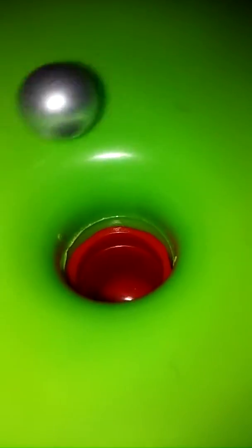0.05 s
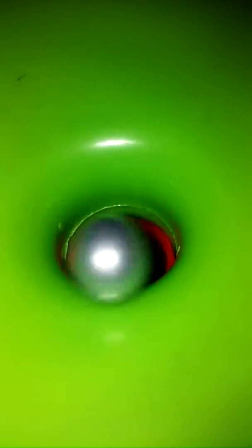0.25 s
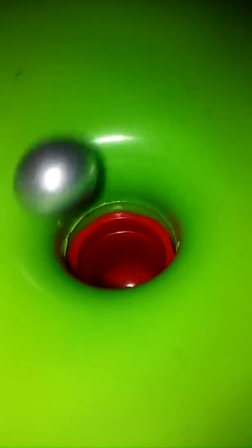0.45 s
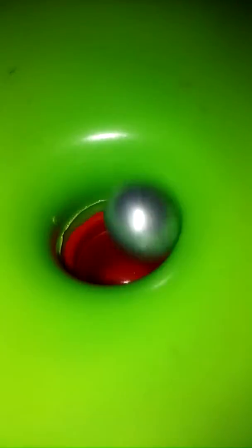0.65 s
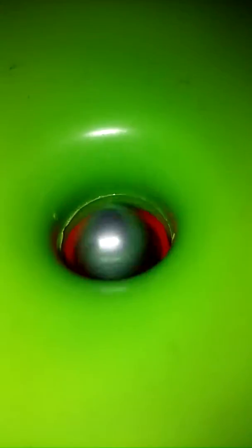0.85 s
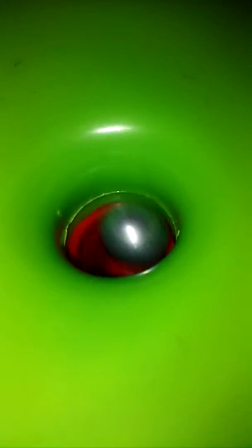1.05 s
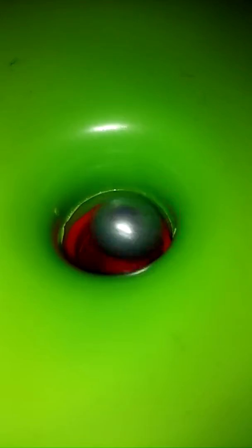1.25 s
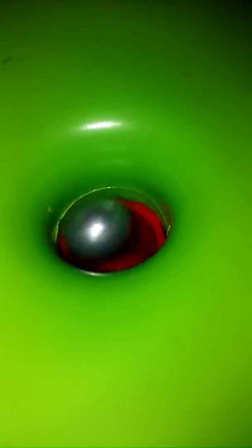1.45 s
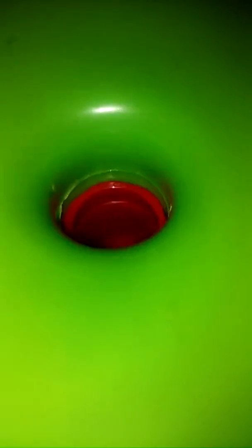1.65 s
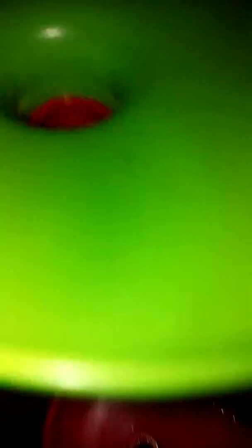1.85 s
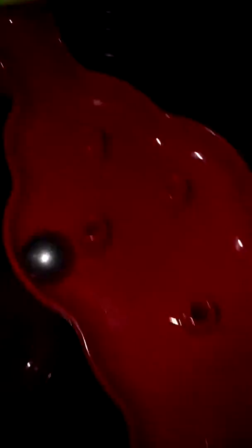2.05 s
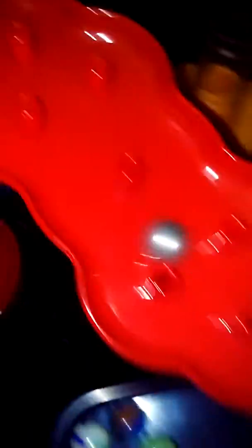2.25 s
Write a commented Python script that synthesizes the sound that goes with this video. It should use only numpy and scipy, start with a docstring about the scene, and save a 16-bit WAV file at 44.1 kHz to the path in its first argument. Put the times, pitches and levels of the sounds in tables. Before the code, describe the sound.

A hard marble rolls and rattles around a plastic funnel, then clacks along a plastic track.

```python
"""A small hard marble rolls and rattles in a plastic funnel, whirls round its throat, drops through
and clacks along a plastic track. Rolling drives the wall's resonances continuously; each impact sets
the thin wall into free, damped vibration, and a small room reverberates. A faint low tone comes and
goes early on; a soft bump and a squeaky scuff end the scene, all over quiet background noise.
The close microphone overloads on the hardest clacks."""
import sys
import numpy as np
from scipy import signal
from scipy.fft import rfft, irfft, next_fast_len
from scipy.io import wavfile
from scipy.ndimage import uniform_filter1d, minimum_filter1d, map_coordinates

SR = 44100
rng = np.random.default_rng(int(sys.argv[2]) if len(sys.argv) > 2 else 0)


def to_wav(sig):
    """Store sig (one row per channel, or 1-D mono) as 16-bit WAV at the path in sys.argv[1].

    Samples outside -1..1 are clipped; the rate is SR.
    """
    pcm = np.clip(np.atleast_2d(sig), -1, 1) * 32767
    pcm = np.round(pcm).astype(np.int16)
    wavfile.write(sys.argv[1], SR, pcm.T)  # frames by channels


N = 105840
TIME = np.arange(N) / SR


def amp(db):
    return 10 ** (np.asarray(db) / 20)


def unit_rms(x):
    return x / np.sqrt(np.mean(x ** 2) + 1e-20)


def along(points, hz):
    """Interpolation of (frequency, value) points on a log axis."""
    f, v = np.transpose(points)
    return np.interp(np.log(hz + 1), np.log(f + 1), v)


def curves(rows):
    """Linear interpolation in time: one curve for each column after the first."""
    times, *columns = np.transpose(rows)
    return [np.interp(TIME, times, column) for column in columns]


def wobble(rate):
    """Smooth random modulation, rate knots a second."""
    return map_coordinates(rng.standard_normal(4096), [TIME * rate], mode="wrap")


def filtered(x, response):
    """Linear filtering: the spectrum times a frequency response."""
    size = next_fast_len(len(x) + 8192)
    return irfft(rfft(x, size) * response(np.fft.rfftfreq(size, 1 / SR)), size)[:len(x)]


def coloured(x, spectrum):
    """Zero-phase filtering by (frequency, gain) points."""
    return filtered(x, lambda hz: amp(along(spectrum, hz)))


def noise(spectrum):
    """Coloured Gaussian noise of rms 1."""
    return unit_rms(coloured(rng.standard_normal(N), spectrum))


def minimum_phase(gain_db, size=4096):
    """Causal impulse response for a gain curve, by folding the cepstrum."""
    cepstrum = irfft(np.log(amp(gain_db(np.fft.rfftfreq(size, 1 / SR)))))
    cepstrum[1:size // 2] *= 2
    cepstrum[size // 2 + 1:] = 0
    return irfft(np.exp(rfft(cepstrum)))


def dense_modes(t60, count, size):
    """Modal overlap: crowded modes act as noise, each frequency decaying at its own rate."""
    hz, t, spectra = signal.stft(rng.standard_normal(count), SR, nperseg=size)
    decay = 1000. ** (-t / np.maximum(t60(hz), .002)[:, None])
    return signal.istft(spectra * decay, SR, nperseg=size)[1][:count]


def mode(t, hz, t60):
    """Free vibration of a damped oscillator."""
    return np.sin(2 * np.pi * hz * t) * np.exp(-np.log(1000) * t / t60)


def rise(t, tau_s):
    return 1 - np.exp(-t / tau_s)


def glide(hz):
    """A sinusoid of rms 1 whose phase is the integral of frequency."""
    return np.sqrt(2) * np.sin(2 * np.pi * np.cumsum(hz) / SR)


def add(out, start_s, x):
    """Superposition of x on out."""
    i = max(round(start_s * SR), 0)
    out[i:i + len(x)] += x[:max(N - i, 0)]


# rolling envelope, ahead of the bass and treble gains (time [s], level [dB])
ROLL_LEVEL = [(0, -35), (.04, -43), (.15, -45.5), (.31, -39.5), (.44, -34), (.48, -29.5), (.52, -40.5),
              (.66, -31), (.82, -34.5), (.92, -33), (1.02, -31.5), (1.16, -30), (1.3, -35.5), (1.42, -29),
              (1.49, -40.5), (1.545, -32), (1.66, -34), (1.745, -32.5), (1.772, -26.5), (1.795, -40),
              (1.97, -48.5), (2.04, -53.5), (2.15, -53), (2.27, -64.5)]
# balance of the rolling sound (time [s], bass gain [dB], treble gain [dB])
ROLL_BALANCE = [(0, -11, -4), (.5, -23, -9.5), (.92, -20, -8), (1.1, 10, -0.5), (1.35, 1, -2),
                (1.5, -8.5, -0.5), (1.72, 0, 2.5), (1.78, -7, 6.5), (2, 2.5, -1)]
# modulation in each turn (time [s], depth [dB])
WHIRL_DEPTH = [(0, 0), (1.3, 3), (1.52, 2.5), (1.76, 3.5), (1.8, 1.5)]
# excitation by surface bumps (frequency [Hz], gain [dB])
ROUGHNESS_SPECTRUM = [(30, -26), (150, -21), (240, 7), (3000, 6.5), (5500, -1.5), (7000, -1.5),
                      (8000, -8.5), (9200, -6.5), (11000, -13.5), (16000, -13)]
# funnel resonances under the marble (frequency [Hz], bandwidth [Hz], gain [dB])
ROLL_RESONANCES = [(260, 36, -5), (573, 43, -1), (843, 450, -10), (1193, 120, 2), (1403, 120, -2),
                   (2070, 120, -2), (2430, 69, -6), (3150, 147, -2.5), (4485, 150, -1.5), (5170, 260, -3),
                   (6730, 180, -6), (8470, 500, -17)]
WHIRL_HZ, NEAREST_S = 44.48, 1.589  # turns a second; a moment nearest the microphone

def rolling():
    """Forced vibration: tiny bumps drive the funnel; each turn swings the level, most in the treble."""
    level_db, = curves(ROLL_LEVEL)
    bass_db, treble_db = curves(ROLL_BALANCE)
    depth_db, = curves(WHIRL_DEPTH)
    turn_db = depth_db * np.cos(2 * np.pi * WHIRL_HZ * (TIME - NEAREST_S) + 0.63 * wobble(20))
    bumps = rng.standard_normal(N) * amp(2.85 * wobble(900) + 1.6 * wobble(110) + turn_db)
    bumps = coloured(bumps, ROUGHNESS_SPECTRUM)
    wall = np.zeros(N)
    for k, (hz, width, db) in enumerate(ROLL_RESONANCES):
        coupling_db = 2.5 * wobble(rate=35)  # swells and fades as the marble crosses nodes
        resonance = filtered(bumps, lambda f: 1j * f * width / (hz * hz - f * f + 1j * f * width))
        wall += (-1) ** k * amp(db + coupling_db) * resonance
    wall = unit_rms(wall)
    bass = filtered(wall, lambda f: 1 / (1 + (f / 400) ** 6))
    treble = filtered(wall, lambda f: 1 - 1 / (1 + (f / 2800) ** 6))
    return amp(level_db) * (wall + (amp(bass_db) - 1) * bass + (amp(treble_db + turn_db) - 1) * treble)


# noise floor (frequency [Hz], relative level [dB])
BACKGROUND_SPECTRUM = [(25, -17.5), (40, -11), (55, 19), (85, 2), (250, 10.5), (600, -3.5), (2000, -6.5),
                       (6000, -18.5), (10000, -21), (16000, -31.5)]

def background(level_db=-53.5):
    """Stationary noise, strongest in the bass."""
    return amp(level_db) * noise(BACKGROUND_SPECTRUM)


# reverberation time (frequency [Hz], t60 [s])
ROOM_DECAY = [(200, 0.44), (1200, 0.16), (4500, 0.16), (6500, 0.31), (8200, 0.18), (15000, 0.099)]
# colour of the reverberation (frequency [Hz], gain [dB])
ROOM_SPECTRUM = [(100, 2.5), (300, 3), (1200, 10.5), (3000, 1), (6500, 3), (8200, -6), (12000, 4.5)]

def room(x, gain_db=-21.5, delay_s=0.0067):
    """Reverberation: convolution with the short diffuse tail of a small room."""
    tail = dense_modes(lambda hz: along(ROOM_DECAY, hz), count=SR // 2, size=256)
    tail = coloured(tail, ROOM_SPECTRUM)
    wet = np.zeros(N)
    add(wet, delay_s, signal.fftconvolve(x, tail / np.linalg.norm(tail)))
    return amp(gain_db) * wet


# wave reflected from the rim (frequency [Hz], gain [dB])
RIM_SPECTRUM = [(700, -41.5), (1600, -4.5), (2500, -3.5), (4500, 5.5), (6500, -1), (9000, 3), (14000, -35)]

def rim_echo(t):
    """Dispersion: bending waves travel faster at high frequency, so the echo chirps down."""
    lag_s = .008 * np.exp(0.199 * rng.standard_normal())  # scale of the travel time
    hz = np.fft.rfftfreq(len(t), 1 / SR)
    phase = np.pi * lag_s * (.4 * hz - 4 * np.sqrt(1000 * hz))
    return irfft(amp(along(RIM_SPECTRUM, hz)) * np.exp(1j * phase), len(t)) * (t < .05)


# colour common to all impacts (frequency [Hz], gain [dB])
WALL_SPECTRUM = [(30, -24), (130, -29.5), (240, 0.5), (400, -2.5), (700, 2.5), (1200, 1), (2200, 2.5),
                 (4500, 5.5), (6800, 13), (8300, 2), (10500, -4.5), (15500, 5)]
# damping of the wall (frequency [Hz], multiple of an impact's base t60 [1])
WALL_DECAY = [(200, 1.8), (1200, 1.72), (4000, 1.46), (7000, 0.67), (11000, 0.49)]
RIM_DB, SPOT_DB, BODY_DB = -5, -2.5, -9  # relative to the burst, the burst and the clack

def clack(t, tint, spot_hz, t60):
    """Impulse response of a thin wall: a burst of dense modes, a rim echo and the struck spot's note."""
    onset = t < .006
    burst = dense_modes(lambda hz: t60 * along(WALL_DECAY, hz), count=len(t), size=64)
    burst *= 1 + 0.74 * np.exp(-t / 0.00085)
    echo = rim_echo(t)
    burst += amp(RIM_DB) * echo * np.linalg.norm(burst[onset]) / np.linalg.norm(echo)
    colour = minimum_phase(lambda hz: along(tint, hz) + along(WALL_SPECTRUM, hz))
    burst = signal.fftconvolve(burst, colour)[:len(t)]
    spot = mode(t, spot_hz, t60=0.025 * np.sqrt(2000 / spot_hz)) * rise(t, .0006)
    both = burst / np.std(burst[onset]) + amp(SPOT_DB) * spot / np.std(spot[onset])
    return both / np.std(both[onset]) * rise(t, 0.00016)


def body_ring(t, modes):
    """Modal superposition: the whole part rings, with random weights and slight detuning."""
    body = np.zeros(len(t))
    for hz, db, t60 in modes:
        weight = amp(db + 5.06 * rng.standard_normal()) * rng.choice([-1, 1])
        body += weight * mode(t, hz * (1 + 0.0076 * rng.standard_normal()), t60)
    return body * rise(t, 0.0019)


def impacts(hits, modes):
    """Impact excitation: each contact gives a local clack and rings the whole part."""
    out, t = np.zeros(N), np.arange(12000) / SR
    fade = 1 - t / t[-1]
    for start_s, db, thud_db, tilt_db, crack_db, spot_hz, t60 in hits:
        tint = [(650, thud_db + 10), (1300, -tilt_db / 2), (2300, -tilt_db / 2),
                (4000, tilt_db / 2 - 4), (6500, tilt_db / 2 - 9),
                (10000, crack_db + 8), (15000, crack_db - 6)]  # (frequency [Hz], gain [dB])
        impact = clack(t, tint, spot_hz, t60) + amp(BODY_DB) * body_ring(t, modes)
        add(out, start_s, amp(db) * impact * fade)
    return out


# contacts with the funnel
# (time [s], level [dB], thud [dB], treble tilt [dB], crack [dB], spot frequency [Hz], base t60 [s])
FUNNEL_CONTACTS = [(0.0452, -26, -30, 26, -9, 1130, 0.032), (0.0932, -22, -17, -5, -35, 2260, 0.037),
                   (0.1079, -27, -14, -10, -34, 2270, 0.026), (0.2082, -38, 0, -36, -33, 2050, 0.029),
                   (0.2314, -14.5, -22, 2, -10.5, 5350, 0.064), (0.2528, -16.5, -19, 6, -16, 1116, 0.029),
                   (0.2796, -26.5, -10, 6, -36, 6400, 0.048), (0.2967, -37, -18, 6, -31, 1150, 0.033),
                   (0.3722, -12.5, -15, -0.5, -14, 2955, 0.062), (0.3932, -14, -14.5, 7, -21, 2060, 0.031),
                   (0.419, -27, -3, 6, -19, 2090, 0.032), (0.5267, -5, -26, -0.5, -23, 2444, 0.037),
                   (0.5402, -5, -14, 1.5, -22, 2402, 0.028), (0.5535, -10, -30, 13, -28, 2490, 0.049),
                   (0.5724, -9, -34, 2, -39, 2054, 0.0093), (0.5897, -15.5, -45, 1, -25, 2060, 0.042),
                   (0.6115, -23.5, -33, 6, -32, 2120, 0.029), (0.6575, -2.5, -15, 3, -47, 1665, 0.065),
                   (0.6769, -14.5, -11, 0, -39, 2090, 0.03), (0.6933, -17, -26, -24, -17, 4550, 0.025),
                   (0.712, -23, -11, -1, -18, 4316, 0.04), (0.7276, -6, -27, -8.5, -23, 3597, 0.019),
                   (0.7695, -9.5, -15.5, -4.5, -26, 1604, 0.021),
                   (0.7949, -11.5, -62, -6, -56, 1670, 0.014),
                   (0.8103, -14.5, -22, -10.5, -28.5, 3860, 0.095),
                   (0.9443, -18.5, -13.5, 16, -15, 2083, 0.092), (0.9532, -12, -48, -11, -25, 1863, 0.0091),
                   (0.9809, -35, -6, 8, -27, 1380, 0.04), (0.997, -31, -1, 23, -10, 2080, 0.036),
                   (1.0496, -21.5, -12, -7, -22, 1445, 0.034), (1.0608, -19, -17, 13, -13, 2870, 0.04),
                   (1.1053, -19, -13, -2, -22, 5080, 0.063), (1.1298, -12.5, -21, -3.5, -45, 1365, 0.031),
                   (1.1377, -21.5, -16, 0, -14, 1250, 0.045), (1.1538, -15, -10.5, -8, -29, 2520, 0.016),
                   (1.1773, -35, 18, 4, -30, 2050, 0.056), (1.1894, -20, -15.5, -10, -38, 4500, 0.021),
                   (1.2084, -21.5, -15, -5, -26, 4420, 0.035), (1.2382, -21, -19, -14, -40, 1850, 0.009),
                   (1.2606, -38, 19, -4, -30, 2100, 0.013), (1.2755, -11, -19, -8, -32, 4530, 0.015),
                   (1.2882, -18.5, -16, -10, -39, 1390, 0.048), (1.2966, -25.5, -6.5, 0, -21, 2060, 0.071),
                   (1.3667, -23.5, -7, 0, -26, 1380, 0.025), (1.7927, -10, -4, 33, -1, 5160, 0.024)]
# normal modes of the funnel (frequency [Hz], relative level [dB], t60 [s])
FUNNEL_WALL_MODES = [(246.1, -21.5, .2), (595, -23.5, 0.11), (1117, -7, 0.12), (1256, -25.5, 0.27),
                     (1410, -12.5, 0.051), (1717, -19.5, 0.18), (2082, -1.5, 0.083), (2290, -5, .08),
                     (2514, -0.5, 0.044), (3097, 0, 0.051), (3650, -7.5, 0.047), (4388, 10, 0.027),
                     (5420, -24, 0.049)]

def funnel_rattle():
    """Free vibration of the funnel after each strike of the marble."""
    return impacts(FUNNEL_CONTACTS, FUNNEL_WALL_MODES)


# course of the low tone (time [s], frequency [Hz], level [dB])
LOW_TONE_PATH = [(.05, 349.4, -71), (.09, 361, -51), (.13, 353, -41), (.21, 323.7, -46.5),
                 (.28, 359.6, -49.5), (.4, 340, -62), (.56, 353.4, -58), (.61, 344, -42), (.69, 335, -42),
                 (.76, 367, -47), (.8, 359.6, -72)]

def low_tone():
    """Amplitude and frequency modulation: a faint tone wavers while the marble circles."""
    hz, db = curves(LOW_TONE_PATH)
    return amp(db) * glide(hz)


# contacts with the track
# (time [s], level [dB], thud [dB], treble tilt [dB], crack [dB], spot frequency [Hz], base t60 [s])
TRACK_CONTACTS = [(1.8152, -4, -20.5, 0.5, -12.5, 1415, 0.03), (1.8731, -19, -5, -8, -21, 2150, 0.04),
                  (1.889, -6.5, -13.5, 2.5, -12.5, 1406, 0.043),
                  (1.9244, -20.5, 6, 16.5, -28.5, 1944, 0.04), (1.9272, -6.5, -12, 2.5, -9.5, 8230, 0.064),
                  (1.9503, -13, -10.5, -2, -21, 2500, 0.054), (2.0102, -33.5, -0.5, 3, -21, 1120, 0.067),
                  (2.1041, -13.5, -6, 7.5, -4.5, 8580, 0.06), (2.1147, -25, -7, -10.5, -40, 2070, 0.052),
                  (2.1437, -23.5, -16, 1, -14, 5900, 0.034), (2.1877, -32, -26.5, -7, -25, 3130, 0.046),
                  (2.2369, -50, -7.5, -7, -15, 1600, 0.031)]
# normal modes of the track (frequency [Hz], relative level [dB], t60 [s])
TRACK_WALL_MODES = [(235, -17, .12), (276, -16, .08), (557, -27, 0.19), (920, -7, 0.17), (1125, 1.5, 0.053),
                    (1362, -3.5, 0.039), (2034, -2, 0.066), (2264, -9, 0.12), (3136, -2, 0.037),
                    (4400, -6, 0.043), (5050, 2.5, 0.045), (6430, -4.5, 0.053)]

def track_clacks():
    """Free vibration of the track as the marble lands and clacks along it."""
    return impacts(TRACK_CONTACTS, TRACK_WALL_MODES)


# course of the squeak (time [s], frequency [Hz], level [dB])
SQUEAK_PATH = [(2.24, 1080, -74), (2.265, 1041, -63), (2.3, 780, -53), (2.35, 799, -49), (2.38, 873, -47.5),
               (2.4, 900, -56)]
# envelope of the scuff (time [s], level [dB])
SCUFF_LEVEL = [(2.25, -67.5), (2.32, -58.5), (2.355, -61), (2.375, -42), (2.4, -44)]
# colour of the scuff (frequency [Hz], relative level [dB])
SCUFF_SPECTRUM = [(150, -9), (500, -0.5), (1000, 2), (1300, -26.5), (1680, 11), (1950, -9.5), (2500, 9.5),
                  (3000, -19), (5200, -27), (7200, 1.5), (9000, -39), (15000, -30)]

def squeaky_scuff():
    """Random frequency modulation roughens a faint squeak over a swell of handling noise."""
    hz, squeak_db = curves(SQUEAK_PATH)
    scuff_db, = curves(SCUFF_LEVEL)
    squeak = amp(squeak_db) * glide(hz * (1 + 0.13 * wobble(350)))
    return squeak + amp(scuff_db) * noise(SCUFF_SPECTRUM)


def soft_bump(start_s=2.309):
    """Heavy damping: one low mode dies within a few cycles."""
    out, t = np.zeros(N), np.arange(SR // 8) / SR
    add(out, start_s, amp(-22) * mode(t, hz=397, t60=0.016) * rise(t, 0.0013))
    return out


def scene():
    """Superposition of the marble's direct sound, its reverberation and the faint sounds around it."""
    marble = funnel_rattle() + track_clacks() + rolling()
    return (marble + room(marble) + low_tone() + squeaky_scuff() + soft_bump() + background())[None]


LIMIT_THRESHOLD, LIMIT_SHARE = 0.99, 0.3  # the limiter removes this share of the excess in dB
CLIP_CEILING, CLIP_HARDNESS = .92, 8
LOW_CUT_HZ, HIGH_CUT_HZ = 187, 16200

def record(dry):
    """Saturation and band limiting: a limiter and soft clip hold the peaks; filters trim both ends."""
    gain = np.minimum(1, LIMIT_THRESHOLD / (np.abs(dry[0]) + 1e-9)) ** LIMIT_SHARE
    limited = dry[0] * uniform_filter1d(minimum_filter1d(gain, size=60), size=40)
    clipped = limited / (1 + np.abs(limited / CLIP_CEILING) ** CLIP_HARDNESS) ** (1 / CLIP_HARDNESS)
    return filtered(clipped, lambda f: 1j * f / (LOW_CUT_HZ + 1j * f) / (1 + (f / HIGH_CUT_HZ) ** 120))[None]


dry = scene()
out = record(dry)
to_wav(out)
```